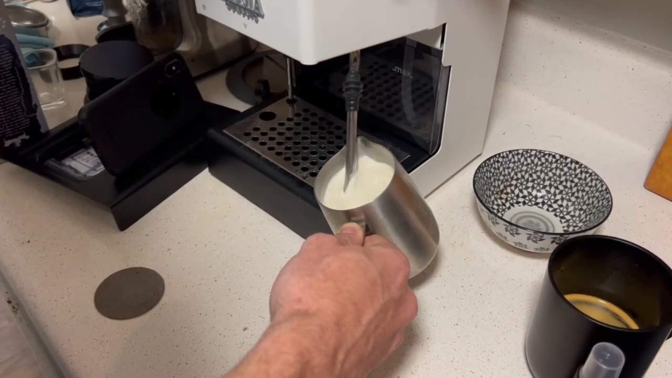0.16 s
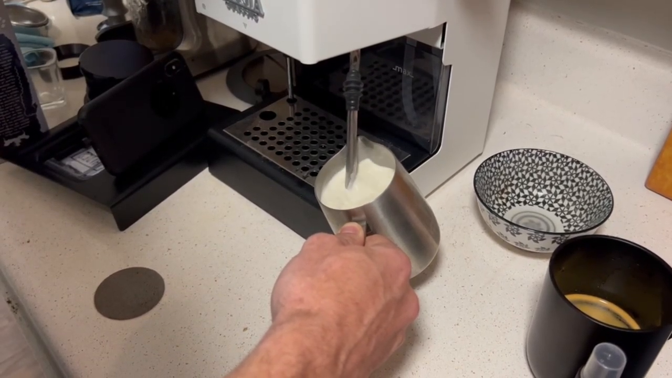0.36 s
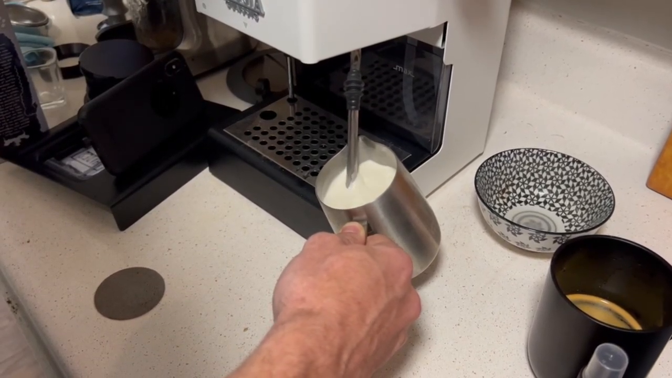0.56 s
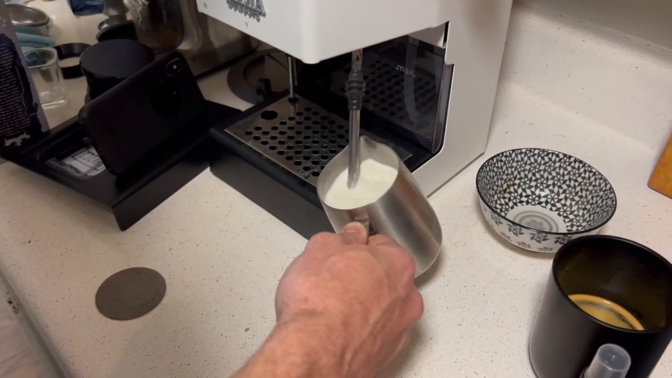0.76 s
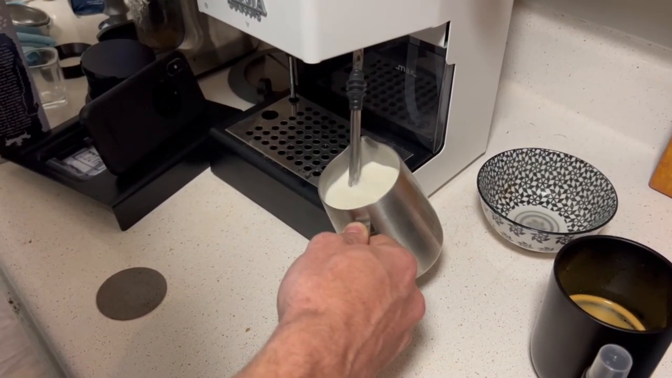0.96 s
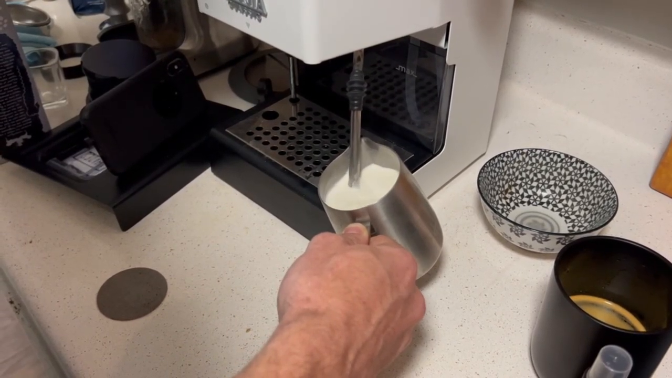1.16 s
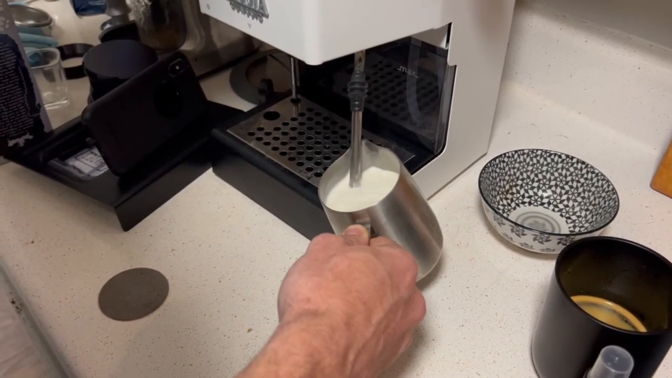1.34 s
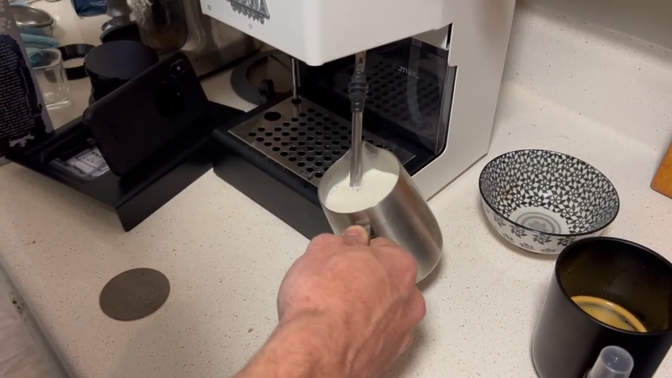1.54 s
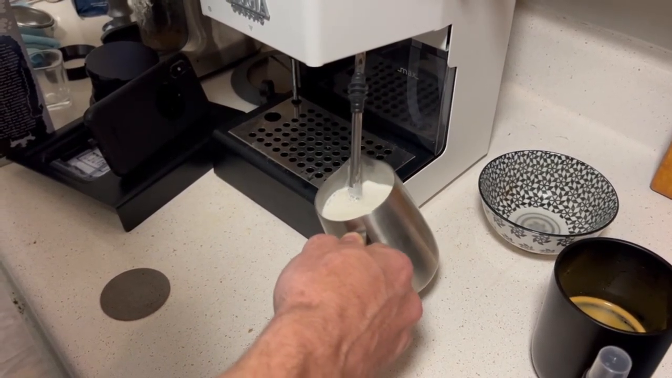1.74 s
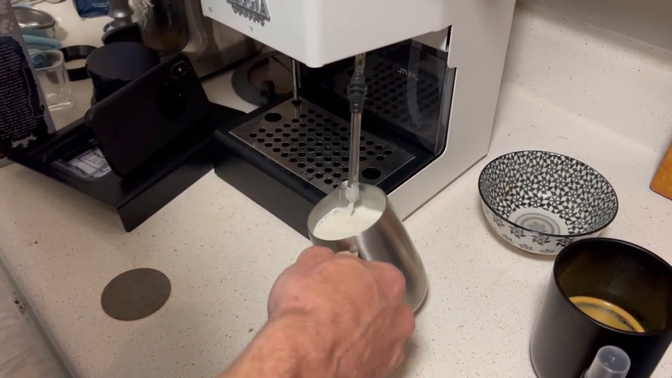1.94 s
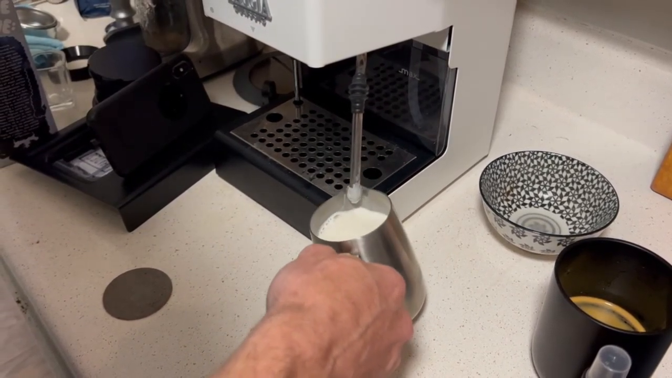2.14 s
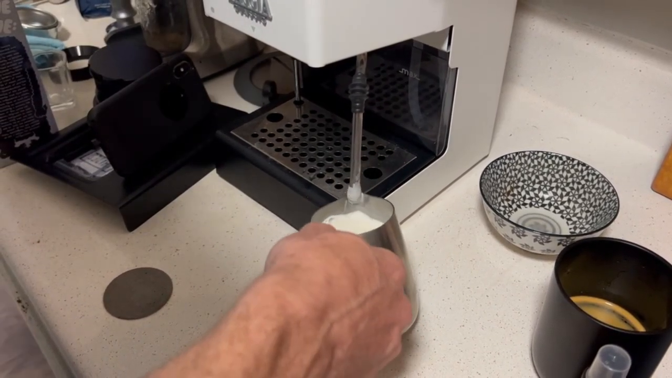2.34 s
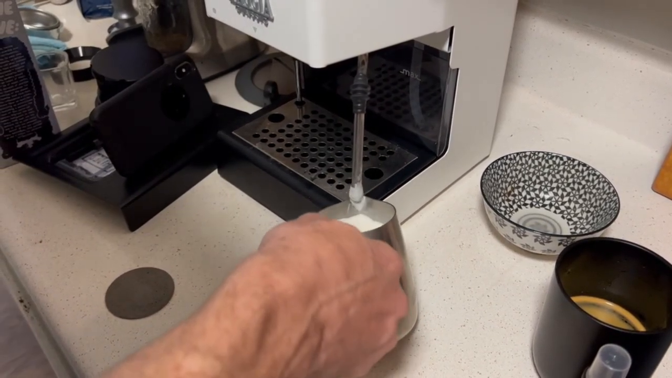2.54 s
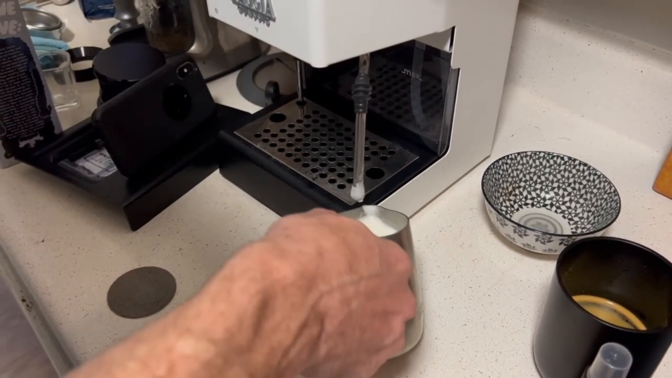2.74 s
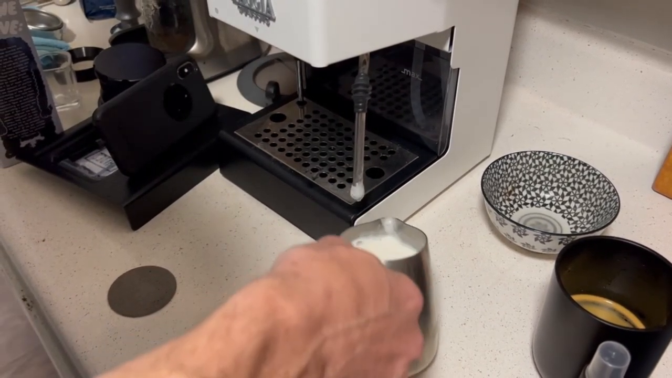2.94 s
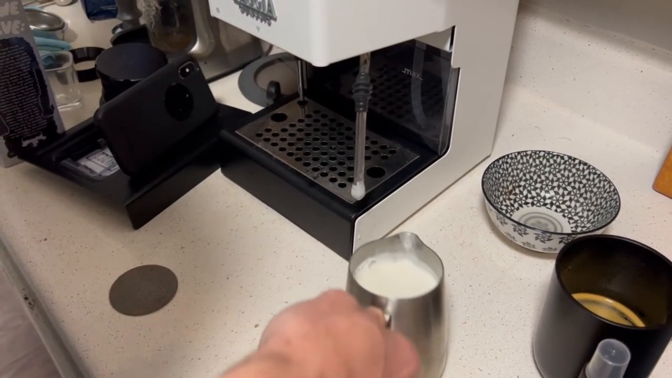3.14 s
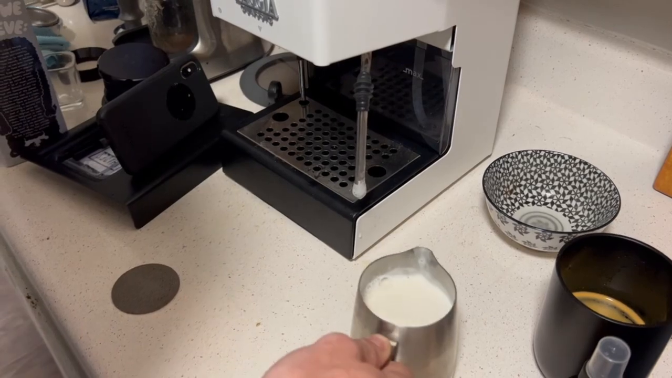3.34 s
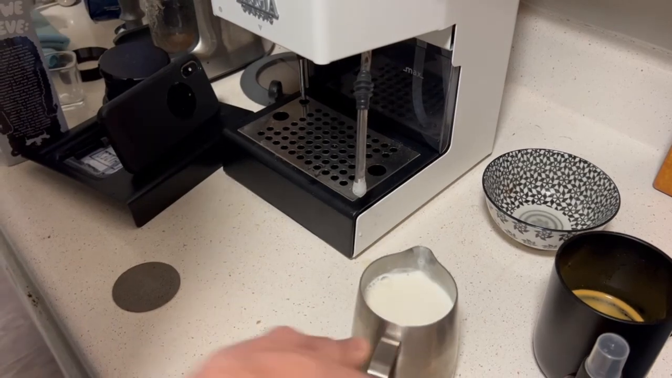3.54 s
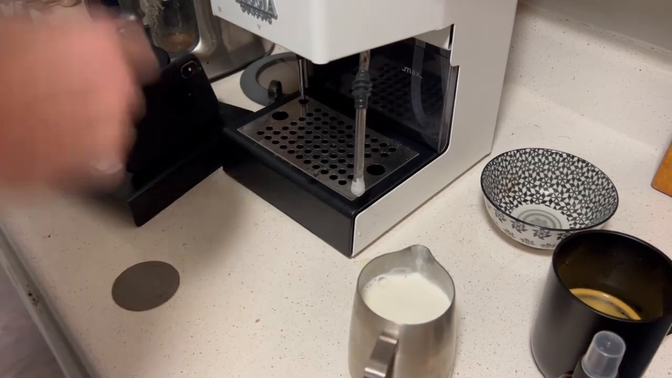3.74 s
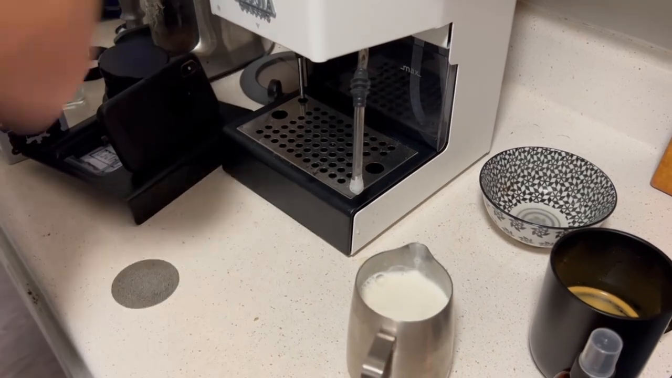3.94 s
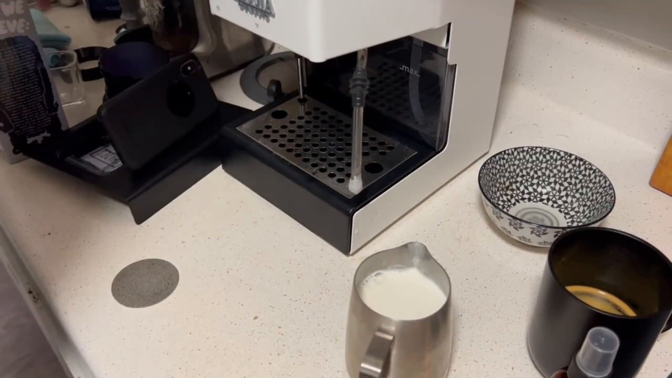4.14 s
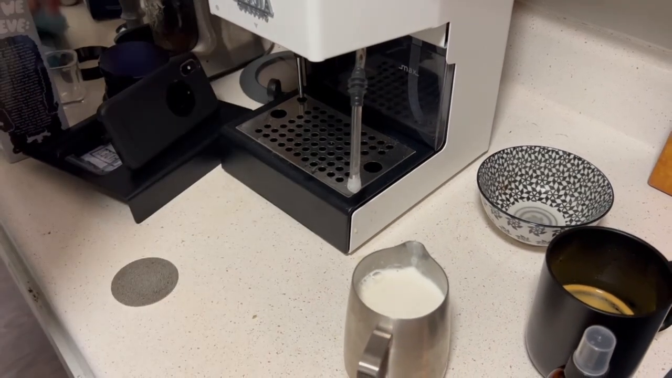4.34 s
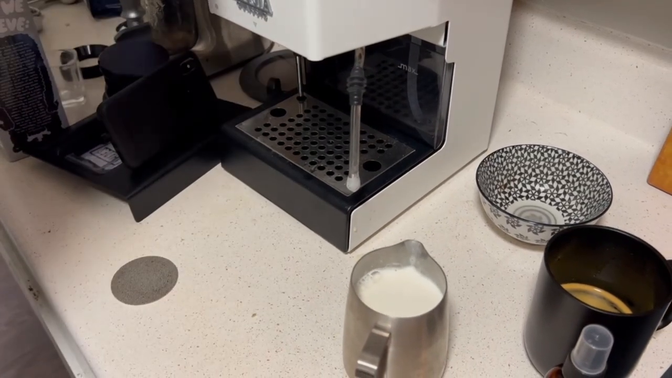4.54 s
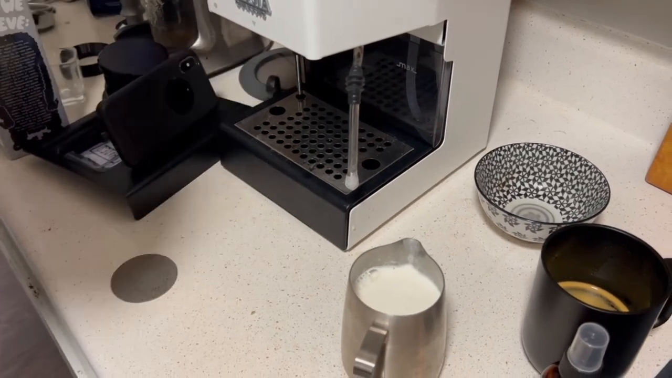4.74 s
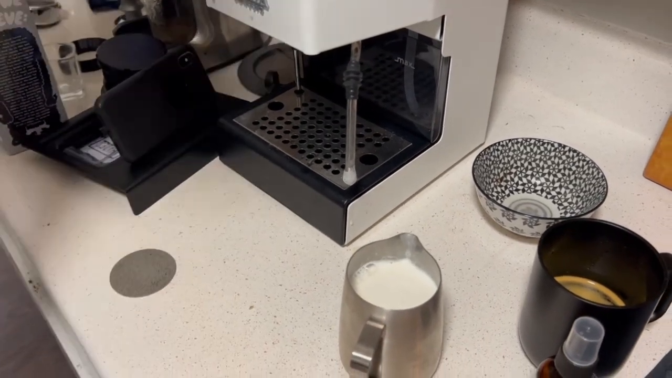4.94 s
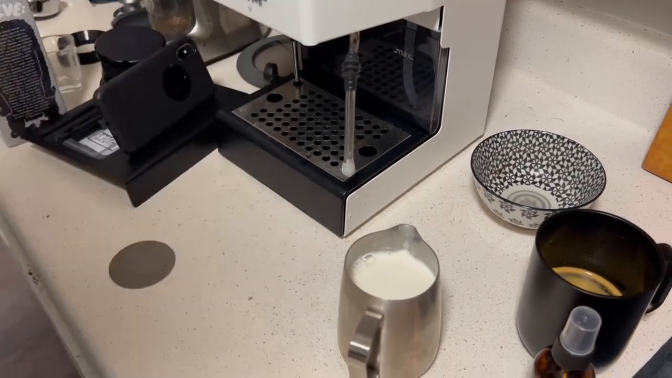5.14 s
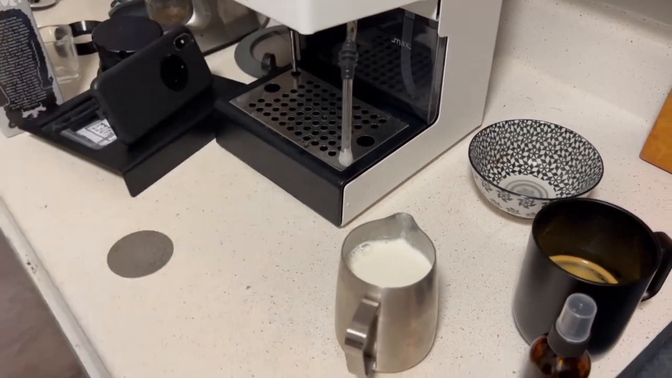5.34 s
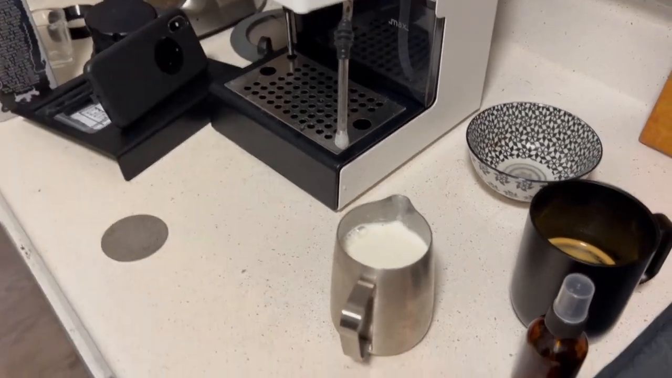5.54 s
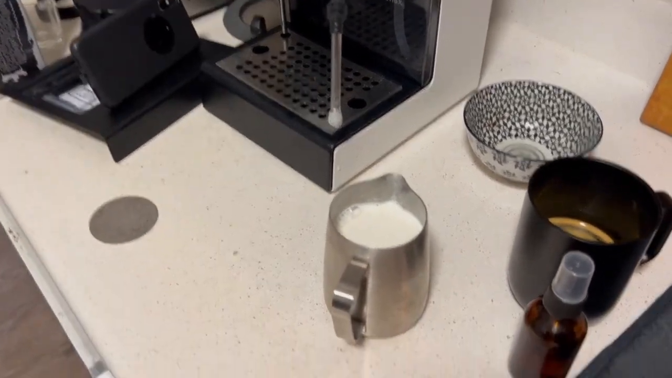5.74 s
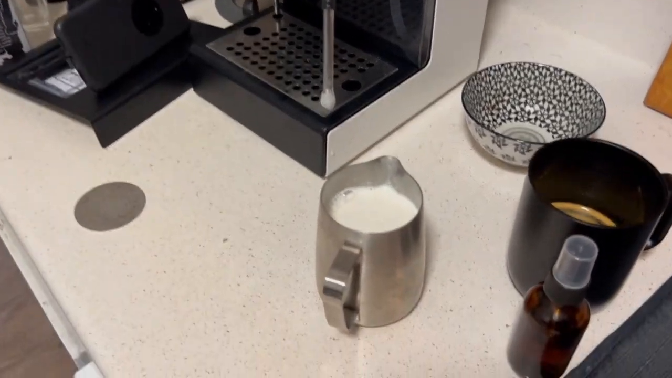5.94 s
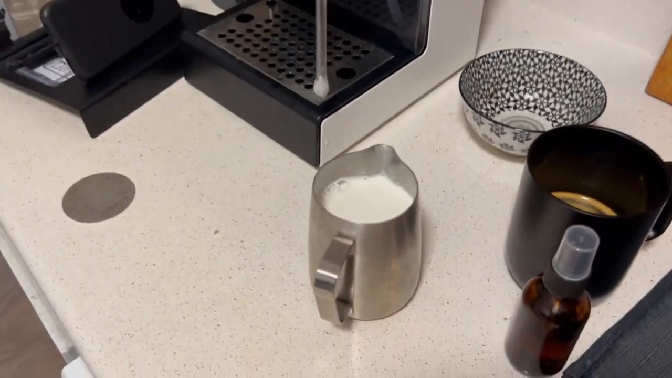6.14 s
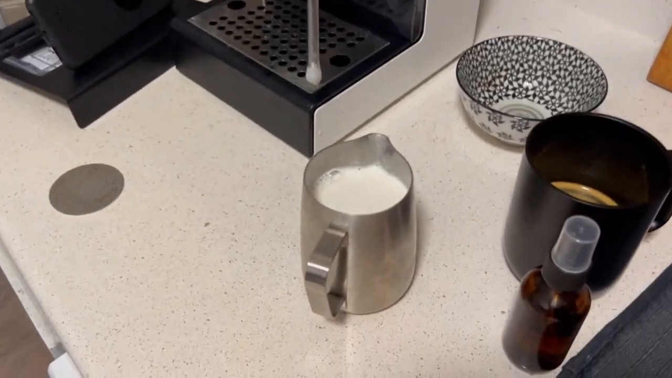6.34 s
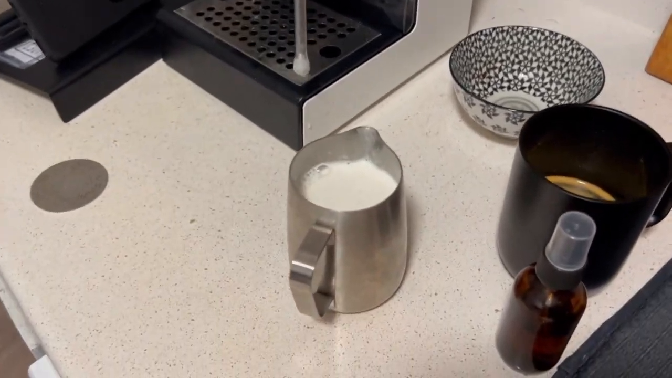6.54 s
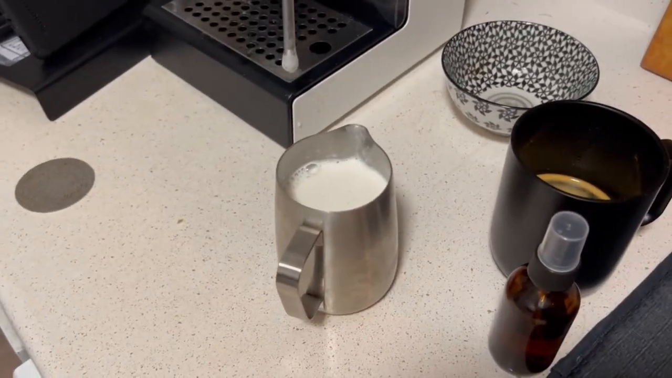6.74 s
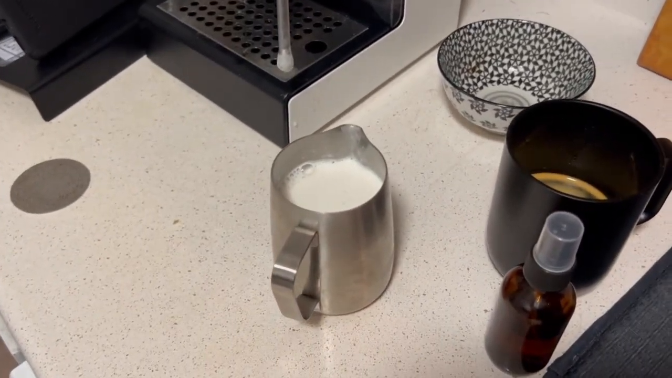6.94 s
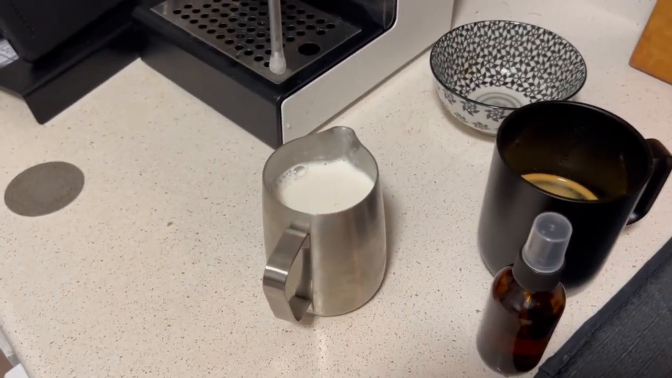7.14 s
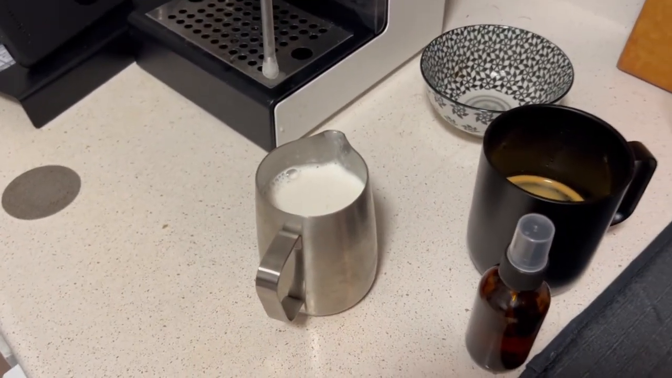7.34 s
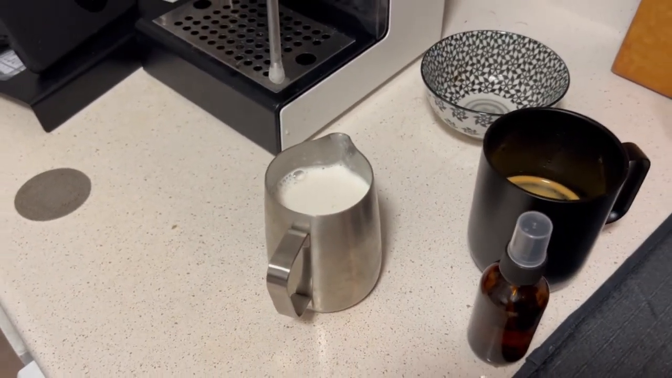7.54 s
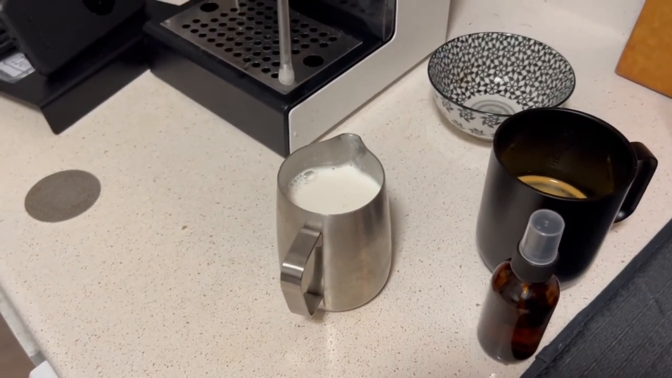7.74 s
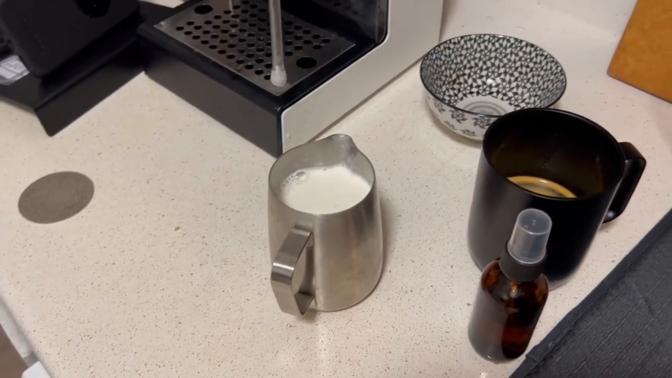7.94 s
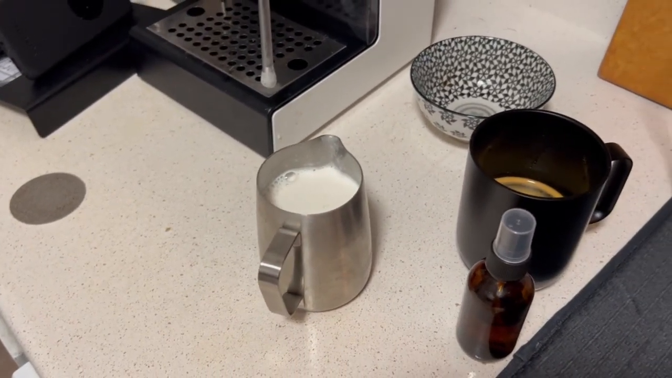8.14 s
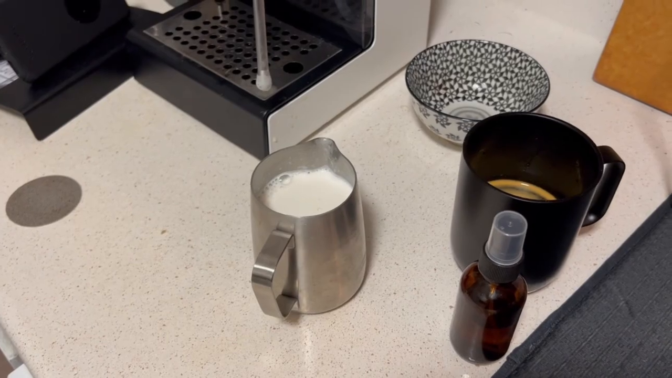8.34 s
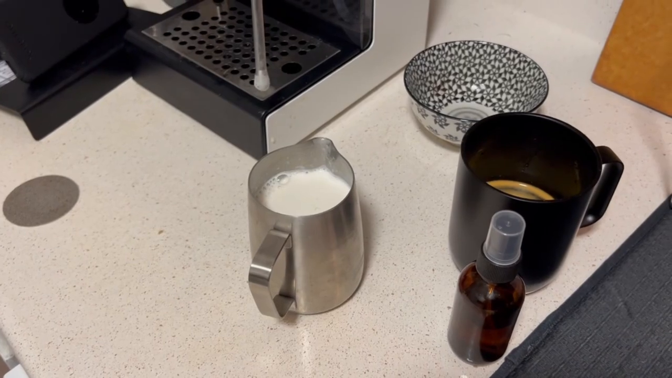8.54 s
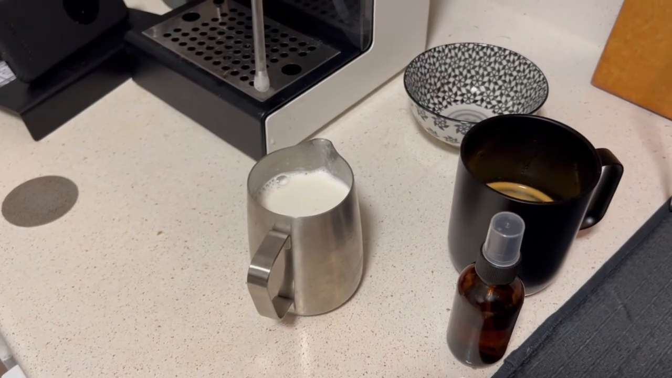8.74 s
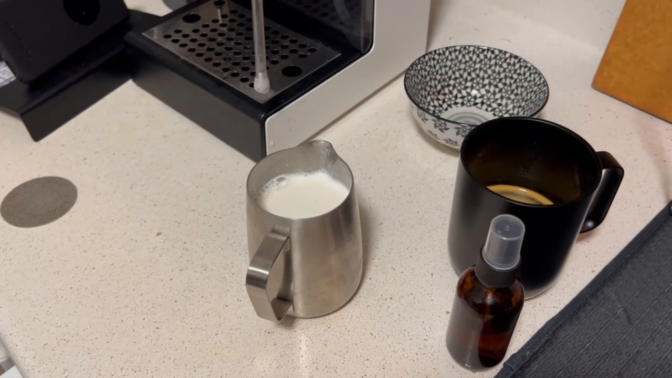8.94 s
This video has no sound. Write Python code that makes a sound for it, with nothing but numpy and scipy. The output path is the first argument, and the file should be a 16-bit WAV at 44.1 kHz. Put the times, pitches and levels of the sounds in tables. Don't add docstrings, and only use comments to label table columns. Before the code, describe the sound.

From 0 s a close steam wand roars in a steel pitcher of milk, with bright fizz and crowded squealing chirps. From about 0.25 s the pitch glides down, a resonant howl sinking to a low groan by 1 s and fading by 1.5 s. Small metallic ticks at 1.8 s lead to a sharp, loud clack with a hollow boom at 1.94 s. Soft scraping follows from 2.3 to 3 s, then a dull bump around 3.25 s. Dry switch clicks come at 3.6 and 3.87 s. A knock at 4.26 s precedes the loudest hard blows at 4.45 and 4.79 s, with a short drag between and cabinet booms. Cloth rustles; a thin spurt hisses at 6.85-7.2 s, then a muffled thud and small clatters until 7.7 s. A refrigerator hums softly throughout the small kitchen, leaving quiet room air to the end.

```python
import sys
import numpy as np
from scipy import signal
from scipy.fft import rfft, irfft, next_fast_len
from scipy.io import wavfile
from scipy.ndimage import uniform_filter1d, map_coordinates

SR = 44100
rng = np.random.default_rng(int(sys.argv[2]) if len(sys.argv) > 2 else 0)


def convert_level_to_amplitude(level_db):
    exponent = np.asarray(level_db, float) / 20
    return 10 ** exponent


def store_wav(level_fs):
    pcm = np.round(np.clip(np.atleast_2d(level_fs), -1, 1) * 32767)
    wavfile.write(sys.argv[1], SR, pcm.T.astype(np.int16))


N = 396459
TIME = np.arange(N) / SR


def unit(x):
    return x / np.sqrt(np.mean(x ** 2) + 1e-20)


def along(points, hz):
    f, v = np.transpose(points)
    return np.interp(np.log(hz + 1), np.log(f + 1), v)


def curves(rows):
    s, *cols = np.transpose(rows)
    gate = np.clip(np.minimum(TIME - s[0], s[-1] - TIME) / 0.031 + 1, 0, 1)
    return [np.interp(TIME, s, c) for c in cols] + [gate]


def wobble(rate_hz):
    knots = rng.standard_normal(int(N * rate_hz / SR) + 4)
    return map_coordinates(knots, [np.arange(N) * rate_hz / SR])


def swells(rows):
    total = 0
    for peak_s, db, rise_s, fall_s in rows:
        away = np.maximum((peak_s - TIME) / rise_s, (TIME - peak_s) / fall_s)
        total = total + convert_level_to_amplitude(db - 20 * away)
    return total


def decaying(noise, t, t60, rise):
    shape = convert_level_to_amplitude(-60 * t / t60) * (1 - np.exp(-t / rise))
    return noise * shape * np.linalg.norm(shape) / np.linalg.norm(noise * shape)


def place(out, start_s, sound):
    start = round(start_s * SR)
    out[..., start:start + sound.shape[-1]] += sound


def filtered(x, response):
    m = next_fast_len(x.shape[-1] + 8192)
    return irfft(rfft(x, m) * response(np.fft.rfftfreq(m, 1 / SR)), m)[..., :x.shape[-1]]


def resonances(peaks, between):
    top_db = max(db for _, _, db in peaks)

    def response(f):
        total = between
        for k, (centre, width, db) in enumerate(peaks):
            damping = 1j * f * width
            total = total + (-1) ** k * convert_level_to_amplitude(db - top_db) * damping / (centre * centre - f * f + damping)
        return total
    return response


def band(low_hz, high_hz):
    return lambda f: 1 / (1 + (low_hz / (f + 1)) ** 4) / (1 + (f / high_hz) ** 4)


def colour(points):
    return lambda hz: convert_level_to_amplitude(along(points, hz))


# pitch_hz, likeness
LIKENESS = [(60, 0.67), (180, 0.53), (550, 0.21), (1650, -0.12), (4970, 0.04), (15000, -0.33)]


def rush(shape, patchy_db, alike=1):
    z = signal.stft(rng.standard_normal((2, N)), nperseg=512)[2]
    field = uniform_filter1d(rng.standard_normal(z.shape[1:]), size=5, axis=0)
    field = uniform_filter1d(field, size=10, axis=1)
    pair = signal.istft(z * convert_level_to_amplitude(patchy_db * unit(field)), nperseg=512)[1][:, :N]

    def spread(hz):
        turn = np.arccos(np.clip(alike * along(LIKENESS, hz), -1, 1)) / 2
        return shape(hz) * [np.cos(turn), np.sin(turn)]
    mid, side = filtered(pair, spread)
    return unit(np.array([mid + side, mid - side]))


# pitch_hz, t60_s
KITCHEN_DECAY = [(100, 0.32), (600, 0.28), (4000, 0.31), (12000, 0.19)]


def room(x):
    out, step = np.zeros((2, N + SR)), SR // 3
    for start in range(0, N, step):
        hz, t, z = signal.stft(rng.standard_normal((2, SR // 2)), SR, nperseg=256)
        mixed = z + 1.5 * z[:1] * along(LIKENESS, hz)[:, None]
        decay = convert_level_to_amplitude(-60 * t / along(KITCHEN_DECAY, hz)[:, None])
        tail = signal.istft(mixed * decay, SR, nperseg=256)[1]
        tail = tail / np.linalg.norm(tail, axis=1)[:, None]
        wet = signal.fftconvolve(x[None, start:start + step], tail, axes=1)
        out[:, start + 150:][:, :wet.shape[1]] += wet
    return out[:, :N]


# pitch_hz, level_db
AIR_SPECTRUM = [(13, -67.5), (22, -30), (48, -2.5), (90, -10), (102, -7), (125, -3), (207, -13.5),
                (272, -9.5), (378, -16), (486, -15), (674, -23), (745, -19.5), (1400, -29), (6490, -50.5),
                (9000, -78), (11700, -77.5), (19800, -120)]
# peak_s, level_db, rise_s, fall_s
HANDLING = [
    (0.97, -55.5, 2.1, 12),
    (2.1, -61.5, 0.74, 16),
    (3.3, -68.5, 2.7, 0.44),
    (4.8, -51, 0.27, 0.33),
    (7.3, -60.5, 3.1, 1),
]


def room_air():
    level = convert_level_to_amplitude(-52.5) + swells(HANDLING)
    return level * convert_level_to_amplitude(-2.0 + 0.8 * wobble(5)) * rush(colour(AIR_SPECTRUM), patchy_db=1)


# pitch_hz, level_db
COMPRESSOR = [(59.2, -59), (118.4, -56.5), (140.0, -71), (274.5, -67)]


def refrigerator_hum():
    hum = 0
    for hz, db in COMPRESSOR:
        level = convert_level_to_amplitude(db + 2 + 0.57 * wobble(4.1))
        hum = hum + level * np.sin(2 * np.pi * hz * TIME + 0.31 * wobble(6.6))
    return hum


# peak_s, level_db, rise_s, fall_s
ARM_MOVES = [(1.81, -53.5, 0.15, 0.21), (2.28, -61, 0.11, 0.33), (3.2, -73.5, 0.45, 1.5),
             (3.95, -65, 0.39, 0.83), (4.69, -69, 0.36, 0.25), (5.17, -57, 0.15, 0.18),
             (5.68, -57.5, 0.64, 0.31), (6.37, -68, 0.42, 0.89), (7.26, -47.5, 0.2, 0.14),
             (7.73, -68.5, 1.2, 0.75), (8.33, -65.5, 0.24, 0.25), (8.75, -65, 0.26, 1.8)]
# pitch_hz, level_db
CLOTH_SPECTRUM = [(710, -31.5), (1200, -5), (1570, 0.5), (2670, -8), (5040, -6), (8360, -11), (9830, -23),
                  (12300, -11), (14700, -19.5), (15800, -34.5)]


def clothes():
    moving = convert_level_to_amplitude(-80.5) + swells(ARM_MOVES)
    return moving * convert_level_to_amplitude(1.4 * wobble(25)) * rush(colour(CLOTH_SPECTRUM), patchy_db=1)


# pitch_hz, level_db
JET_SPECTRUM = [(290, -33), (500, -16.5), (1080, -12), (1300, -5), (1440, -12.5), (1680, -8.5), (4060, -16),
                (8250, -3), (9530, -5), (9950, -2.5), (10400, -4.5), (11000, -3), (11500, -12.5),
                (15800, -10)]


def tap_spurt():
    start_s, length_s, open_s, shut_s = 6.838, 0.35, 0.029, 0.053
    t = TIME - start_s
    outside = np.maximum(0, np.maximum(-t / open_s, (t - length_s) / shut_s))

    def basin(hz):
        comb = 0.2 * np.cos(2 * np.pi * (hz - 1290) / 455) + 0.35 * np.cos(2 * np.pi * hz / 190)
        return colour(JET_SPECTRUM)(hz) * (1 + comb)
    level = convert_level_to_amplitude(-35.5 - 20 * outside + 0.6 * wobble(50))
    return level * rush(basin, patchy_db=0.4, alike=0.8) * convert_level_to_amplitude([[-0.8], [0.8]])


# start_s, peak_db
SWITCH = [
    (3.595, -37.5),
    (3.609, -37),
    (3.644, -40),
    (3.872, -32.5),
    (4.146, -40),
]
# pitch_hz, level_db, t60_s
HOUSING_MODES = [(850, -1, .025), (1370, 0, .022), (2000, -5, .016), (2500, -6, .015), (3060, -2, .016),
                 (3600, -6, .015)]


def switch_clicks():
    out, t = np.zeros(N + SR), np.arange(SR // 16) / SR
    for s, db in SWITCH:
        luck_db = rng.normal(0, 3.2, len(HOUSING_MODES))
        ring = 0
        for (hz, level_db, t60), more_db in zip(HOUSING_MODES, luck_db):
            ring = ring + convert_level_to_amplitude(level_db + more_db - 60 * t / t60) * np.sin(2 * np.pi * hz * t)
        snap = filtered(rng.standard_normal(len(t)), band(910, 4700))
        snap = 3 * convert_level_to_amplitude(-60 * t / 0.006789) * snap
        place(out, s, convert_level_to_amplitude(db - 6.5) * (1 - np.exp(-t / 0.0014)) * (ring + snap))
    return out[:N]


# peak_s, scrape_db, rise_s, fall_s
PUSHES = [
    [(2.36, -44.5, 0.096, .12), (2.625, -43.5, 0.049, 0.047), (2.75, -43, 0.068, 0.13),
     (2.81, -47.5, 0.089, 0.084), (2.86, -41.5, 0.04, 0.098), (2.92, -48, 0.068, 0.14),
     (2.99, -52.5, 0.044, 0.068)],
    [(4.64, -40, 0.073, 0.15), (4.725, -31, 0.16, 0.067)],
]
# pitch_hz, width_hz, level_db
BASE_MODES = [
    [(330, 60, -8), (455, 70, 0), (640, 80, -14), (820, 80, -14), (1020, 60, -12)],
    [(275, 50, 0), (680, 50, -21), (950, 50, -14)],
]
# rumble_db, grit_db
UNDER_SCRAPE = [(0, -9), (-9.5, -16)]


def slides():
    rumble, grit = rush(band(60, 190), patchy_db=1), rush(band(700, 1800), patchy_db=2)
    out = 0
    for pushes, modes, (rumble_db, grit_db) in zip(PUSHES, BASE_MODES, UNDER_SCRAPE):
        base = resonances(modes, between=0.05)
        scrape = rush(lambda hz: np.abs(base(hz)) * band(150, 1100)(hz), patchy_db=1)
        out = out + swells(pushes) * (scrape + convert_level_to_amplitude(rumble_db) * rumble + convert_level_to_amplitude(grit_db - 8.5) * grit)
    return out * convert_level_to_amplitude(0.92 * wobble(37))


# start_s, peak_db, ring_hz, sizzle_db, left_right_db
DRY_CONTACTS = [(1.826, -30, 3400, -6, 3), (1.834, -29, 3400, -6.5, 0.5), (1.838, -32.5, 6400, -8.5, 1),
                (1.847, -42.5, 2600, -4.5, -5), (6.53, -56, 8900, 5, 1), (1.8805, -32, 7130, -0.5, 1.5),
                (1.92, -38, 2040, -36, 12), (2.085, -36.5, 2660, -19, -4.5), (2.0855, -33, 5160, -18, 0),
                (2.3901, -49, 3170, -23, 4), (2.57, -51, 1900, -30, -1), (2.969, -56, 2900, -23, 0),
                (3.11, -53, 2950, -22, 0), (3.1624, -49, 2330, -15, -7), (3.229, -47, 2100, -25, -1),
                (3.3331, -51, 2470, -38, 5), (3.407, -57, 2010, -21, 3), (3.871, -39, 3040, -6, 2.5),
                (4.258, -27, 1500, -20, 5), (1.94, -30, 2300, -22, 2), (4.446, -24, 4500, -18, 1),
                (4.469, -32, 3000, -22, 0), (4.785, -33, 4000, -18, 0), (4.841, -38, 3500, -20, 0),
                (5.1111, -49, 2340, -1, 20), (5.785, -52, 4030, 4, 3), (7.2815, -32, 2290, -24, -2),
                (7.2924, -28.5, 6700, -21, -9.5), (7.4664, -27.5, 6470, -0.5, 3.5),
                (7.4177, -36, 4250, -15.5, 0), (7.472, -35, 4100, -26, -1), (7.5285, -38.5, 2680, -24, -1),
                (7.535, -42, 4000, -25, 0), (7.642, -52, 8800, -6, 0), (7.71, -42.5, 2110, -30, 0),
                (5.629, -45, 4500, -10, 2), (6.545, -54, 15000, -20, 0), (7.6074, -49.5, 2920, -0.5, 4),
                (7.7092, -35, 5800, -14, 7)]
# start_s, peak_db, ring_hz, sizzle_db, left_right_db
DRAGGED_CONTACTS = [
    (1.6204, -56, 2860, -16, -1),
    (2.2925, -51, 2330, -21.5, -6.5),
    (2.3188, -47, 2090, -28, -0.5),
    (2.33, -45.5, 1400, -30, 0),
    (2.35, -47, 2040, -23, -5),
    (5.6284, -43.5, 4500, -5.5, 3.5),
    (6.367, -50, 5500, -0.5, 5.5),
    (7.384, -45, 6160, 9, 0),
    (7.418, -38, 4430, -14, -0.8),
]


def small_contacts():
    out, t = np.zeros((2, N + SR)), np.arange(SR // 8) / SR
    contacts = [(*row, 0.039) for row in DRY_CONTACTS] + [(*row, 0.19) for row in DRAGGED_CONTACTS]  # t60, s
    for s, db, hz, sizzle_db, pan_db, t60 in contacts:
        raw = rng.standard_normal((3, len(t)))
        ring = filtered(raw[0], resonances([(hz, 0.18 * hz, 0)], between=0.039))
        ring = decaying(ring, t, t60, 0.0012)
        snap = 0.66 * decaying(filtered(raw[1], band(2000, 7000)), t, 0.44 * t60, 0.0017)
        sizzle = decaying(filtered(raw[2], band(7000, 15500)), t, 0.018, 0.0057)
        sides = convert_level_to_amplitude([[db - 5.5 + pan_db / 2], [db - 11.0 - pan_db / 2]])
        place(out, s, sides * (ring + snap + convert_level_to_amplitude(sizzle_db + 12.0) * sizzle))
    return out[:, :N]


# start_s, peak_db, pitch_hz
BOOMS = [(1.94, -10.5, 181), (1.953, -17, 123), (1.968, -22, 140), (3.235, -31, 188), (3.295, -28, 109),
         (3.319, -30, 66), (4.263, -19, 170), (4.275, -26, 100), (4.309, -24.5, 201), (4.447, -7, 205),
         (4.475, -13.5, 204), (4.52, -24, 171), (4.566, -22, 211), (4.785, -4, 200), (4.8, -14, 170),
         (4.817, -24, 150), (4.85, -13, 150), (4.889, -15, 167), (6.593, -33, 102.6), (6.62, -31.5, 67.8),
         (6.738, -41, 109), (6.772, -37.5, 171), (7.252, -17, 125), (7.262, -24, 85), (7.268, -19.5, 160)]


def cabinet_thuds():
    out, t = np.zeros(N + SR), np.arange(SR // 4) / SR
    sag, sag_s = 0.45, 0.0054
    stretched = t + sag * sag_s * (1 - np.exp(-t / sag_s))
    for s, db, hz in BOOMS:
        low_hz = max(0.55 * hz, 95)
        swing = np.sin(2 * np.pi * hz * stretched) + 0.55 * np.sin(2 * np.pi * low_hz * stretched)
        place(out, s, convert_level_to_amplitude(db + 5.5 - 60 * t / 0.062) * (1 - np.exp(-t / 0.0069)) * swing)
    return out[:N]


# start_s, pitch_hz, level_db, t60_s
STRUCK_TONES = [(1.77, 1600, -54.5, 0.66), (1.75, 3050, -61, .6), (1.75, 4600, -67, 0.53),
                (1.84, 1400, -41, 0.12), (1.881, 1720, -27.5, 0.023), (1.89, 500, -41, 0.1),
                (1.918, 1550, -32, 0.031), (1.94, 473, -2, 0.045), (1.94, 420, -10, .04),
                (1.941, 230, -16, .05), (1.945, 380, -15, 0.1), (1.945, 280, -18.5, 0.098),
                (1.95, 600, -19.5, 0.093), (1.941, 1055, -7, 0.035), (2.27, 1040, -55, 0.57),
                (2.875, 2050, -54, 0.1), (2.58, 1050, -54, .06), (2.575, 2000, -51, .04),
                (4.263, 327, -32.5, 0.33), (4.262, 940, -28, 0.2), (4.262, 1900, -28, 0.1),
                (4.259, 5600, -35, 0.07), (1.941, 840, -17.5, 0.089), (1.94, 1563, -21.5, 0.077),
                (1.941, 2060, -23, 0.032), (4.448, 330, -20.5, 0.26), (4.447, 510, -19, 0.16),
                (4.447, 558, -25.5, .25), (4.447, 646, -11.5, .1), (4.447, 785, -16, .12),
                (4.466, 720, -16.5, 0.06), (4.448, 880, -22, 0.2), (4.448, 1000, -25.5, .3),
                (4.455, 1130, -26.5, 0.38), (4.455, 1070, -26.5, .2), (4.449, 1335, -24, .15),
                (4.455, 1770, -27, 0.13), (4.448, 1900, -30, .15), (4.787, 650, -16, 0.063),
                (4.787, 903, -23, .11), (4.787, 453, -24, 0.17), (4.842, 1000, -25.5, .12),
                (4.884, 980, -29, 0.091), (4.266, 800, -24, 0.094), (4.27, 1300, -30, .1),
                (4.47, 2360, -32, .1), (4.468, 1520, -26, .1), (4.565, 700, -31, .1), (4.802, 716, -21, .1),
                (4.783, 1550, -24, .04), (4.845, 460, -26, .08), (3.23, 463, -37, 0.063),
                (3.232, 900, -46, .05)]


def rings():
    out, t = np.zeros(N + SR), np.arange(SR // 3) / SR
    rough = convert_level_to_amplitude(2.2 * wobble(90))
    for s, hz, db, t60 in STRUCK_TONES:
        drift = np.cumsum(signal.lfilter([0.2], [1, -0.8], rng.standard_normal(len(t))))
        tone = np.sin(2 * np.pi * hz * t + (0.03 + hz / 1.5e5) * drift)
        place(out, s, convert_level_to_amplitude(db - 60 * t / t60) * (1 - np.exp(-t / 0.0025)) * tone)
    return rough * out[:N]


# start_s, clack_peak_db, body_hz, body_above_clack_db, t60_s
BLOWS = [(1.9394, -7.5, 460, -2, 0.035), (1.969, -54, 423, 14, 0.023), (2.082, -44.5, 449, 8.5, 0.19),
         (3.229, -49.5, 448, 21.5, 0.072), (3.293, -45, 413, 5, 0.05), (2.575, -44, 560, 0, .05),
         (4.262, -21, 854, -28.5, 0.081), (4.289, -30, 940, -30.5, 0.064), (4.308, -32.5, 333, -1, 0.056),
         (4.33, -33.5, 890, -5.5, 0.047), (4.446, 2, 643, 1.5, 0.021), (4.467, -17, 610, -8, 0.047),
         (4.498, -28, 363, -13, 0.068), (4.56, -25, 340, 1, 0.065), (4.786, -12, 889, 6, 0.043),
         (4.84, -20.5, 897, 2.5, 0.064), (4.884, -24.5, 978, 9.5, 0.036), (7.243, -35.5, 725, 4.5, 0.33)]
# start_s, clack_peak_db, body_hz, body_above_clack_db, t60_s
FIRST_EDGES = [
    (4.434, -36, 870, -19, 0.33),
    (4.441, -27, 870, -19, 0.1),
    (4.781, -22, 895, -26, 0.094),
    (7.24, -38, 667, 12, 0.055),
]
# pitch_hz, width_hz, level_db
WORKTOP = [(470.4, 26, -11), (729, 33, -6), (812, 140, 13.5), (940, 16, 15), (1093, 55, -7.5),
           (1440, 70, -16.5), (1900, 43, -9)]
# pitch_hz, width_hz, level_db
MILK_FILLED = [(478, 62, -1), (635, 50, -5), (828, 50, -9), (1055, 70, 0), (1570, 100, -6),
               (2000, 200, -10)]
CLACK_EDGE = (1620, 1250)


def knocks():
    out, t = np.zeros((2, N + SR)), np.arange(SR // 4) / SR
    for s, db, hz, body_db, t60 in BLOWS + FIRST_EDGES:
        raw = rng.standard_normal((3, len(t)))
        milk = int(s < 4)
        onset = (1 - np.exp(-t / 0.00074)) ** 2
        tone = convert_level_to_amplitude(-60 * t / (0.93 * t60)) * onset * np.sin(2 * np.pi * hz * t)
        body = tone + 1.27 * decaying(filtered(raw[0], band(250, 520)), t, 0.55 * t60, 0.0018)
        clack = decaying(filtered(raw[1], band(430, CLACK_EDGE[milk])), t, t60, 0.00087)
        crack = filtered(raw[2], lambda f: band(1800, 6000)(f) ** 2)
        crack = decaying(crack, t, 0.97 * t60, 0.00058)
        crack_gain = convert_level_to_amplitude(-21 + 0.5 * db)
        blow = convert_level_to_amplitude(body_db - 2.5) * body + clack + crack_gain * crack
        place(out[milk], s, convert_level_to_amplitude(db - 4.5) * blow)
    crockery = filtered(out[0, :N], resonances(WORKTOP, between=0.98))
    pitcher = filtered(out[1, :N], resonances(MILK_FILLED, between=0.63))
    return filtered(crockery + pitcher, band(40, 7000))


# start_s, pitch_hz, level_db
POCKETS = [(0.017, 1615, -26.5), (0.076, 1883, -28), (0.099, 1635, -29.5), (0.157, 1450, -34.5),
           (.19, 1820, -28), (0.241, 1527, -44), (.27, 1578, -33.5), (0.36, 1250, -42.5),
           (0.502, 1570, -45), (0.557, 1400, -25), (.6, 1400, -49.5), (.63, 1427, -45),
           (0.939, 1537, -41.5), (0.949, 1400, -55), (1.159, 1530, -46.5), (1.302, 386, -41),
           (.045, 1425, -29), (.125, 1600, -36), (0.211, 1944, -38), (.33, 1310, -45), (.03, 1900, -31.5),
           (.11, 1946, -38), (.225, 1690, -35.5), (.005, 1500, -40), (.3, 1350, -40)]


def squeal():
    luck = rng.random((len(POCKETS), 16, 3))
    start, hz, db = np.array(POCKETS).T[:, :, None, None]
    small = np.arange(16)[:, None] > 0
    start = start + small * 0.076 * luck[..., :1]
    hz = hz * (1 + small * 0.221 * (luck[..., 1:2] - 0.5))
    t = np.arange(SR // 12) / SR
    life = 0.0056 + 0.0048 * luck[..., 2:]
    pulse = t / life * np.exp(-t / life)
    chirps = convert_level_to_amplitude(db + 6 - 8.5 * small) * pulse * np.sin(2 * np.pi * hz * t * (1 - 0.836 * t))
    where = (start * SR).astype(int) + np.arange(len(t))
    return np.bincount(where.ravel(), chirps.ravel(), N)


# pitch_hz, width_hz, level_db
PITCHER_MODES = [(387, 21.7, 3), (655, 61, -0.5), (899, 17, 0.5), (1010, 100, 1), (1257, 12, 0.5),
                 (1400, 42, 2), (1553, 47, -3.5), (1840, 190, -0.5), (2050, 60, 0), (2480, 160, -1)]
# start_s, pitch_hz, level_db
HOWL_GLIDE = [(.25, 1502, -43), (.4, 1035, -44.5), (.45, 990, -43), (.54, 715, -44), (.59, 589.4, -52),
              (.62, 500, -39), (.66, 460, -39), (.69, 389.3, -41), (.73, 345.4, -45), (.8, 262.9, -40.5),
              (.875, 197.3, -43), (.96, 191.8, -43), (.99, 180, -54), (1.22, 125, -51.5)]
HARMONICS = [3, -4.5, -11, -16, -21.5, -24, -21.5, -26]


def howl():
    hz, level_db, voiced = curves(HOWL_GLIDE)
    hz = hz * (1 + 0.009 * wobble(90))
    phase = 2 * np.pi * np.cumsum(hz) / SR
    walls = resonances(PITCHER_MODES, between=0.13)
    out = 0
    for k, db in enumerate(HARMONICS, 1):
        level = convert_level_to_amplitude(level_db + db + 9.0 + 5.13 * wobble(37.97))
        worktop_echo = convert_level_to_amplitude(-8 * np.exp(-((k * hz - 784) / 66) ** 2))
        gain = np.abs(walls(k * hz)) * worktop_echo * band(60, 2500)(k * hz) ** 2
        out = out + level * gain * np.sin(k * phase)
    return voiced * out


# start_s, roar_db
VALVE = [(0.0, -40.5), (0.03, -33), (.17, -35), (0.28, -38), (0.42, -35.5), (0.62, -38), (0.72, -45.5),
         (.84, -46), (.96, -46), (1.08, -48.5), (1.3, -51.5), (1.47, -67), (1.6, -69)]
# pitch_hz, level_db
ROAR_SPECTRUM = [(120, -66.5), (200, -5), (381, -12), (782, -10), (899, -7), (1550, -4), (2500, -30.5),
                 (3380, -47), (5720, -120)]
# pitch_hz, level_db
FIZZ_SPECTRUM = [(1290, -49), (2300, -3), (2900, -7.5), (4510, -14), (8230, -28), (9090, -38), (9400, -39),
                 (13300, -28), (15800, -45)]
# pitch_hz, width_hz, level_db
NOZZLE_HOLES = [(3475, 99, -1), (3690, 170, -0.5), (3980, 150, -4.5)]


def steam_jet():
    walls, holes = resonances(PITCHER_MODES, between=0.24), resonances(NOZZLE_HOLES, between=0)
    roar_db, gate = curves(VALVE)
    fizz_db = -47.5 - 34 * np.maximum(TIME - 0.22, 0)
    whistle_db = -49.5 - 90 * np.maximum(TIME - 0.24, 0)
    roar = rush(lambda hz: colour(ROAR_SPECTRUM)(hz) * np.abs(walls(hz)), patchy_db=1.2)
    fizz = rush(colour(FIZZ_SPECTRUM), patchy_db=1)
    whistle = rush(lambda hz: np.abs(holes(hz)) ** 2, patchy_db=2.5)
    noise = convert_level_to_amplitude(roar_db + 2.4 * wobble(44.12)) * roar
    noise = noise + convert_level_to_amplitude(fizz_db + 0.89 * wobble(60)) * fizz
    noise = noise + convert_level_to_amplitude(whistle_db + 2.5 * wobble(170)) * whistle
    return gate * noise


def scene():
    background = room_air() + refrigerator_hum() + clothes()
    switch, small, booms = switch_clicks(), small_contacts(), cabinet_thuds()
    tones, blows = rings(), knocks()
    voice = howl() + squeal()
    sent = 0.9 * blows + 0.3 * tones + 0.26 * booms + 0.3 * voice
    wet = room(sent + 0.75 * small.mean(axis=0) + 0.25 * switch)
    near = voice * convert_level_to_amplitude([[1.5], [-1.5]]) + booms + (blows + tones) * convert_level_to_amplitude([[0.3], [-0.3]])
    near = near + small + switch * convert_level_to_amplitude([[1.8], [-1.8]])
    return steam_jet() + near + wet + slides() + tap_spurt() + background


def top_cut(x):
    return signal.sosfilt(signal.butter(12, 15870, fs=SR, output="sos"), x)


def record(dry):
    mid, side = (dry[0] + dry[1]) / 2, (dry[0] - dry[1]) / 2

    def mid_response(hz):
        notch_db = -45 * np.exp(-((hz - 10300) / 750) ** 6)
        return convert_level_to_amplitude(notch_db) / (1 + (hz / 15650) ** 90)

    def side_response(hz):
        bass_db = -9 / (1 + (hz / 250) ** 4)
        notch_db = -22 * np.exp(-((hz - 13300) / 1200) ** 4)
        return convert_level_to_amplitude(bass_db + notch_db) / (1 + (hz / 15750) ** 90)
    mid, side = filtered(mid, mid_response), filtered(side, side_response)
    mid = signal.sosfilt(signal.butter(3, 47, "high", fs=SR, output="sos"), mid)
    both = np.array([mid + side, mid - side])
    both = both / (1 + np.abs(both / 0.95) ** 6) ** (1 / 6)
    return top_cut(both)


dry = scene()
out = record(dry)
store_wav(out)
```